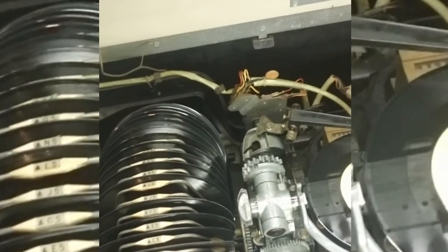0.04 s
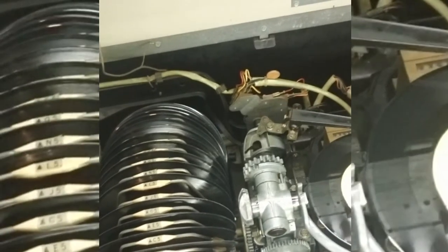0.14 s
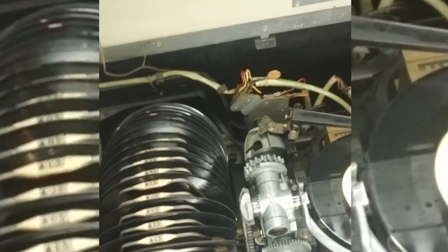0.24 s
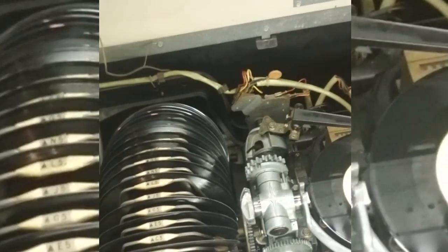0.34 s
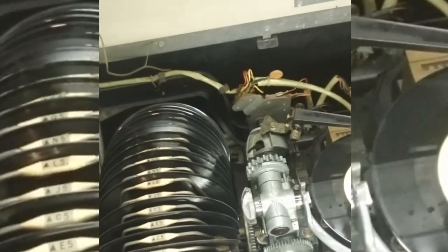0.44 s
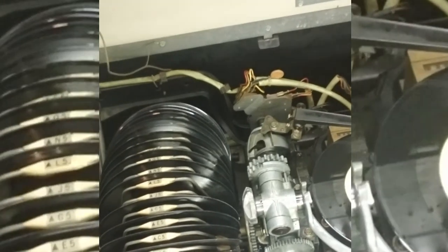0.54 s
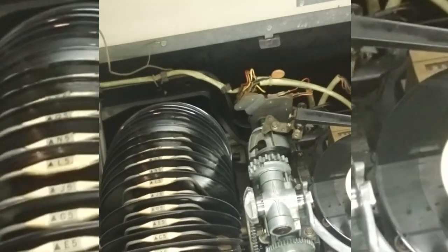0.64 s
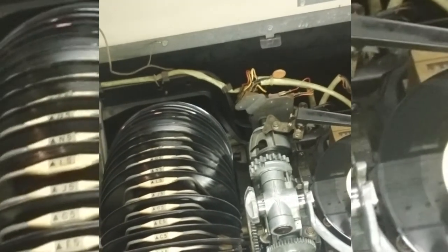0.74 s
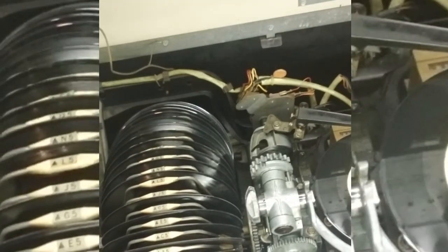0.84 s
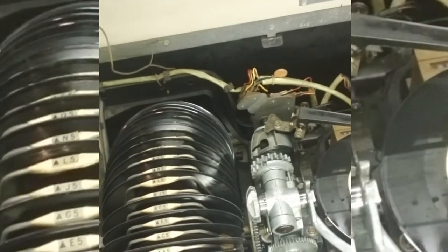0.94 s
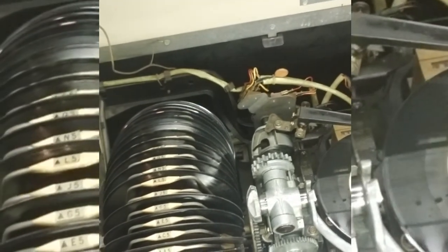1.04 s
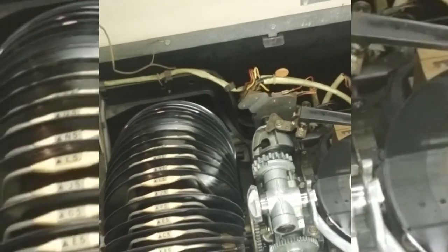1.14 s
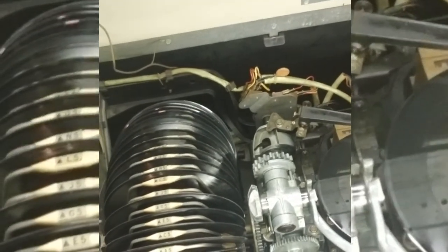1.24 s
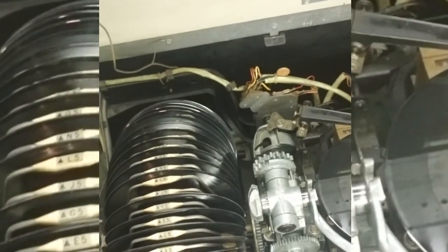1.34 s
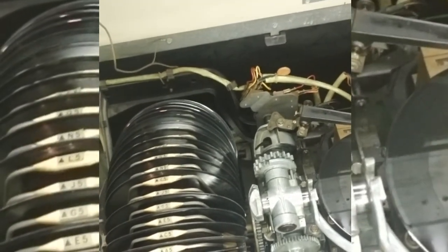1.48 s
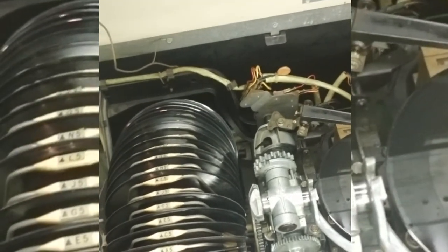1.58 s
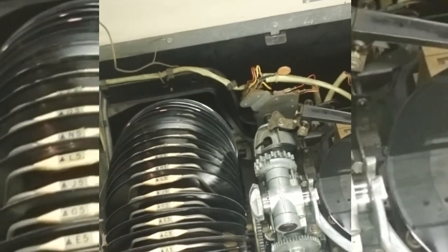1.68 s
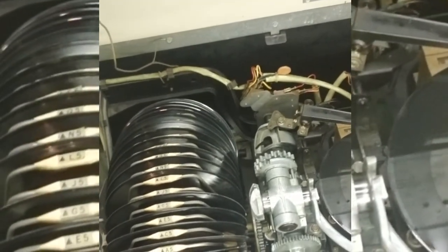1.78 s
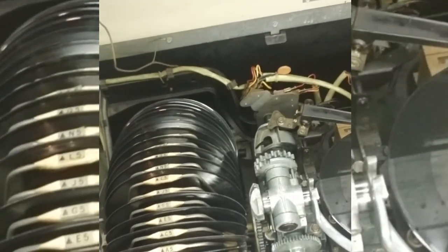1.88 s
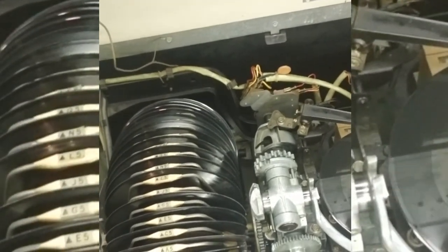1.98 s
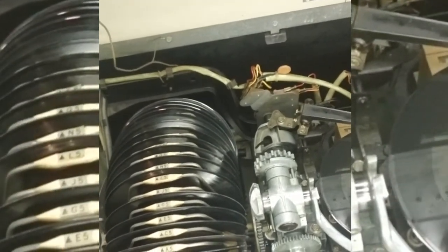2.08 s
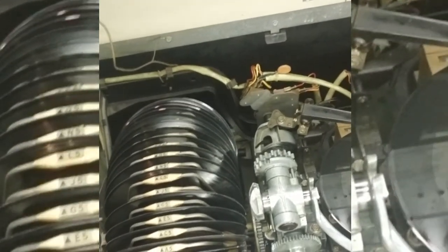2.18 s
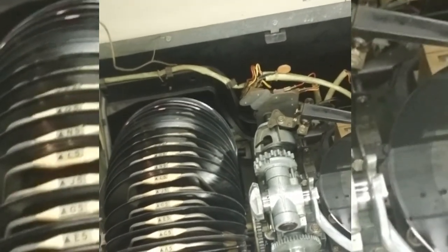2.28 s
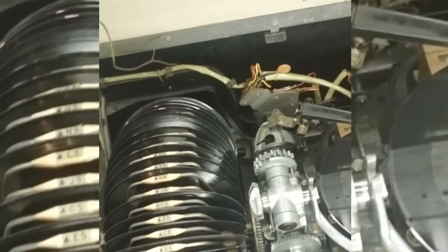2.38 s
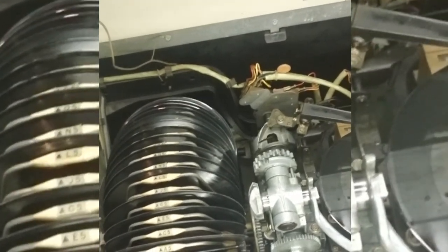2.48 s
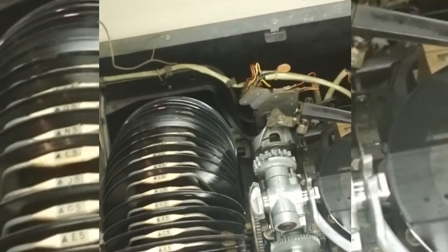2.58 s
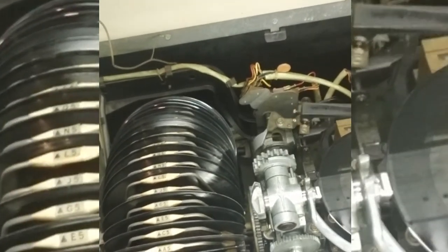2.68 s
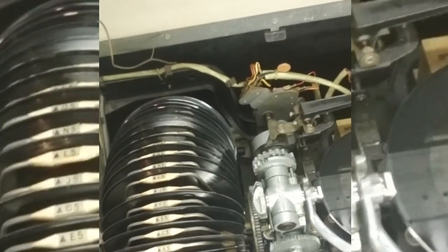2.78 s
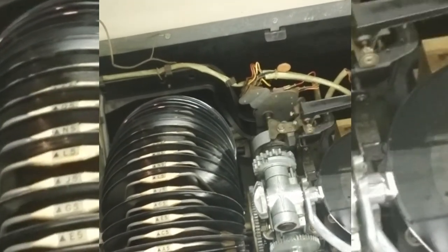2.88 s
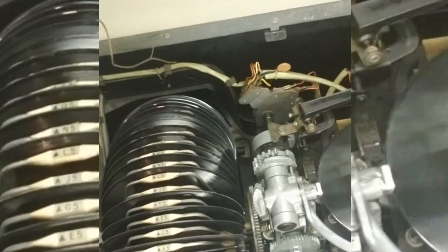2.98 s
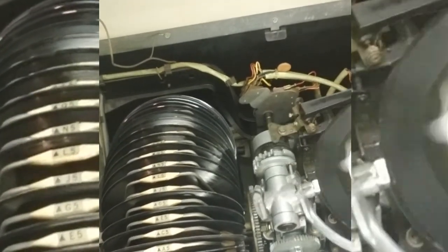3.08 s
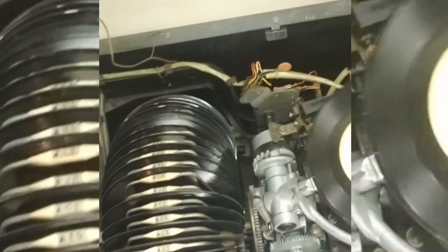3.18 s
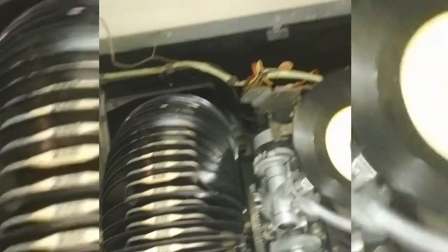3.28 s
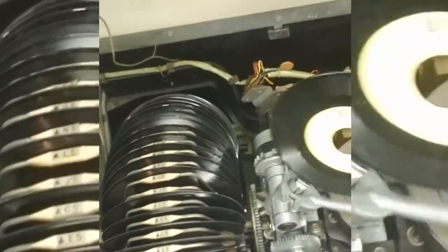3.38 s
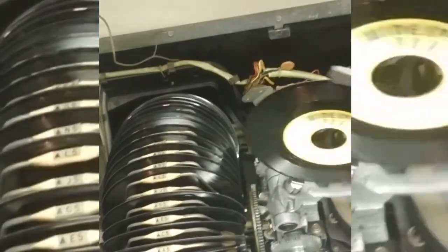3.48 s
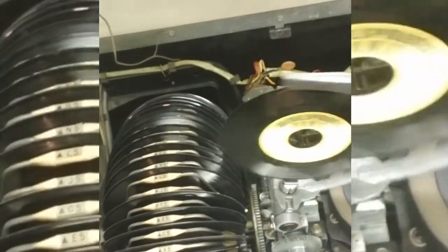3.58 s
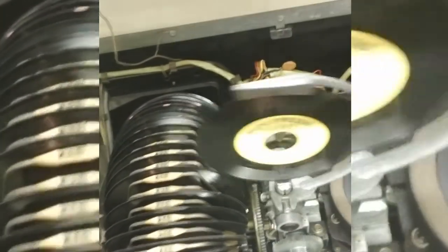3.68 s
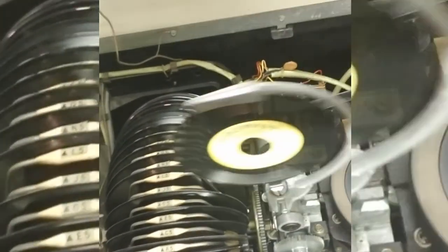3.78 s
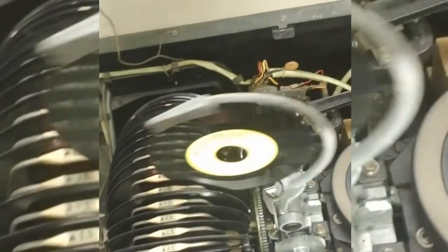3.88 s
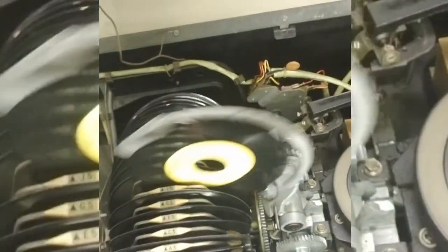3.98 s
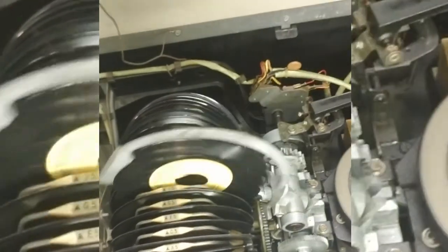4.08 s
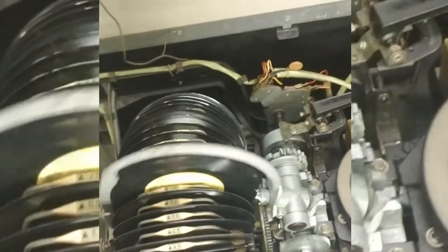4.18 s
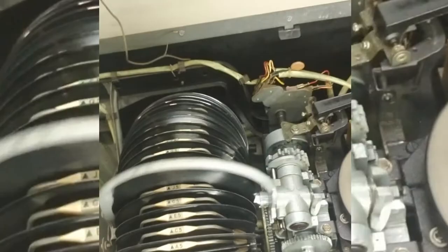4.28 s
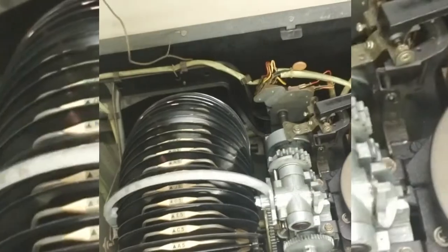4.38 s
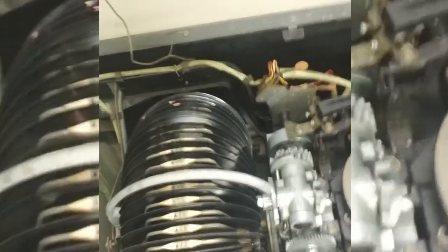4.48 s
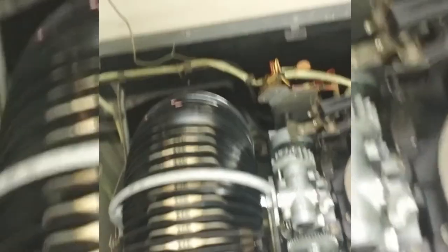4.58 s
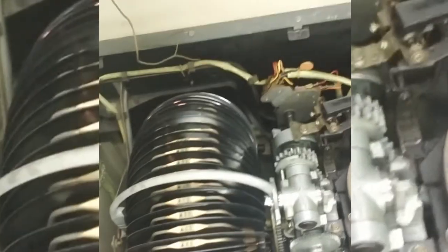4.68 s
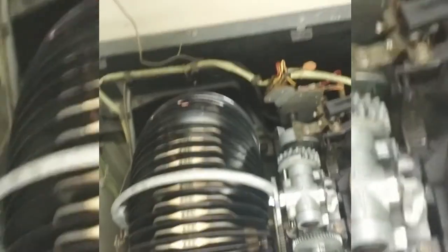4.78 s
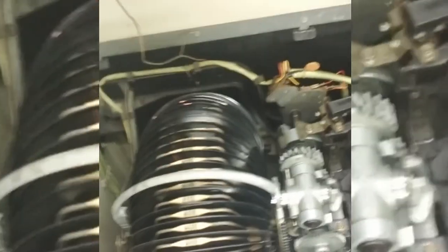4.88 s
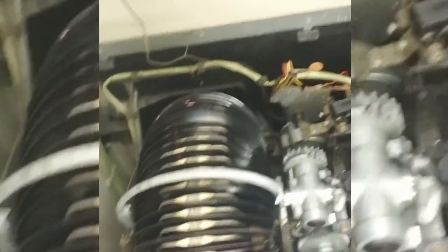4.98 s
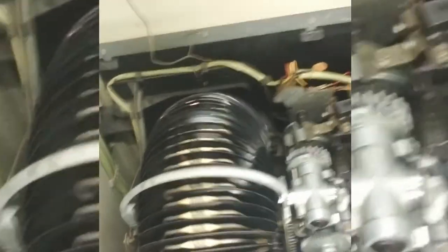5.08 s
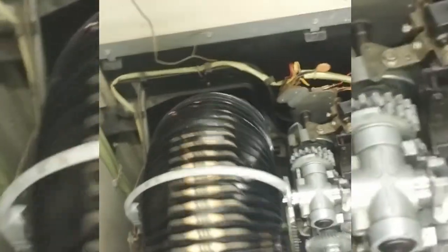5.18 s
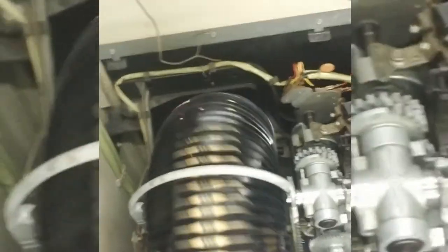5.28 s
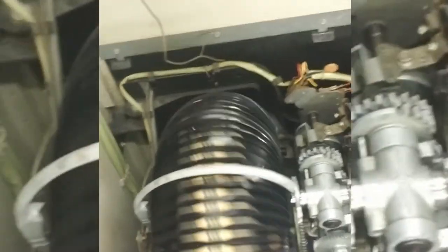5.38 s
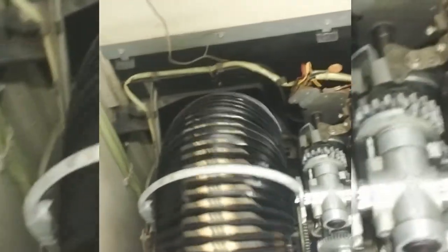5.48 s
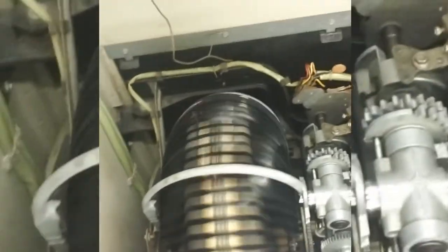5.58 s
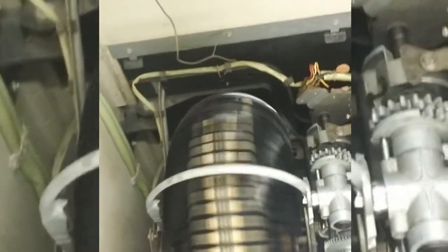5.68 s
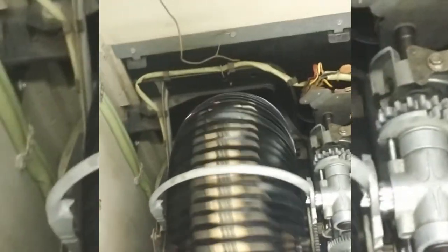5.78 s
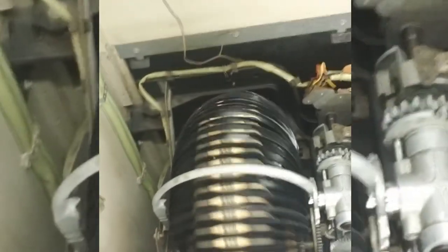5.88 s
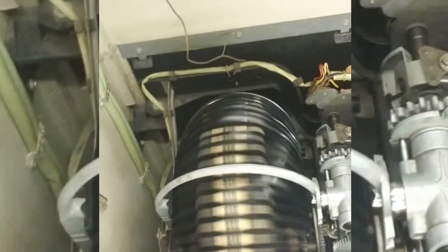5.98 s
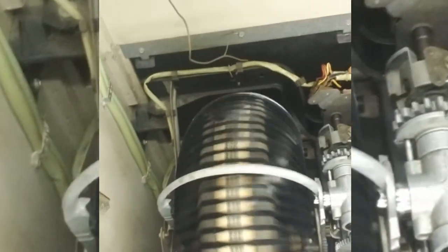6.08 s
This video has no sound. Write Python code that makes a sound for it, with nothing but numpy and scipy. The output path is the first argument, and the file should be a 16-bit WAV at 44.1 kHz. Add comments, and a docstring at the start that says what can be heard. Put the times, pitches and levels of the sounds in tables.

```python
"""Inside an old record changer, heard from close by in a quiet room.
Mains hum and a low rumble lie under everything. A latch trips, levers and cams clack and ring, and
the cabinet thumps. A small motor's gears whirr and whine as the arm puts a record back.
Then the record magazine spins up, and the records rattle in their slots over a wide rush."""
import sys
import numpy as np
from scipy import signal
from scipy.fft import rfft, irfft, next_fast_len
from scipy.io import wavfile
from scipy.ndimage import uniform_filter1d

SR = 44100
rng = np.random.default_rng(int(sys.argv[2]) if len(sys.argv) > 2 else 0)


def materialize(psi):
    """Save the field psi as 16-bit PCM at rate SR to the path in sys.argv[1].

    A 1-D psi becomes a single channel; in a 2-D psi each row is a channel.
    """
    bounded = np.clip(np.atleast_2d(psi).T, -1, 1)
    quanta = np.round(bounded * 32767).astype(np.int16)
    wavfile.write(sys.argv[1], SR, quanta)


N = 270839

# Blows of levers and cams; pan is left minus right, and a decay is the time to fade by 60 dB:
# start_s, level_db, pan_db, ring_hz, decay_s, treble_db, body_db
LEVER_BLOWS = [(2.228, -63, 3, 2500, 0.11, -30, 9), (2.2431, -9.5, 0.5, 6800, 0.11, 12, -7),
               (2.251, -25.5, 3, 6750, 0.28, -9, -41), (2.2606, -16.5, -30, 7540, 0.12, 22, -21),
               (2.3132, -22.5, 2, 1870, 0.057, 5, -6), (2.46, -27, 4, 4140, 0.065, -35, -29),
               (2.4797, -15.5, 1, 4080, 0.068, -16, -23), (2.571, -37.5, 3, 1960, 0.037, -39, 4),
               (2.6285, -34.5, 4.5, 2950, 0.065, 6, 5), (2.723, -41, 4, 11700, 0.073, 1, -2),
               (2.815, -30, 2, 5100, 0.072, -1, -12), (2.828, -23.5, 0.5, 10500, 0.19, 8, -41),
               (2.8494, -29, 3, 3670, 0.11, -4, -40), (2.8736, -17.5, -1.5, 13500, 0.062, -3, -16.5),
               (2.8938, -25.5, 2, 2300, 0.049, -9, -30), (2.9312, -19, 2, 15000, 0.14, 2, -13),
               (2.962, -20.5, -1.5, 3400, 0.086, 0, -15), (2.9831, -22.5, -1, 3370, 0.16, 0, -8.5),
               (3.003, -23, 0, 3070, 0.081, 5.5, -34), (3.0235, -30.5, 0, 3020, 0.27, -26, -13),
               (3.036, -31.5, 9, 5700, 0.061, -18, -9), (3.0483, -28, 0, 9400, 0.024, -1, -15),
               (3.5173, -38, 5, 3830, 0.12, 0, -5), (3.6299, -24.5, 2, 3920, 0.084, -43, -20),
               (3.664, -36.5, -3, 2550, 0.13, -34, -5), (4.021, -30, 2, 3560, 0.077, -36, 0.5),
               (4.035, -26, 4, 2220, 0.06, -35, -11), (4.1137, -40.5, -3, 2050, 0.067, -18, 0),
               (4.2816, -32.5, 1.5, 3780, 0.06, -7, -11), (4.312, -39, 0, 3200, 0.08, -7, -5),
               (4.3526, -32, 2, 2500, 0.073, 1, 4), (4.3602, -13, 11, 7640, 0.099, 2, -23),
               (4.3657, -17.5, 7, 13800, 0.09, -19, -12), (4.3732, -12, -6.5, 15270, 0.098, 3, -13),
               (4.379, -26, 11, 2400, 0.063, 4, -1), (4.3848, -23.5, 8, 3750, 0.092, -17, -11),
               (4.399, -30, 0.5, 477, 0.24, -30, -3.5), (4.492, -32.5, 0, 2960, 0.13, -22, -23),
               (4.9875, -32, 8, 7140, 0.04, 5, -33), (5.004, -31.5, -3, 760, 0.05, -15, -12), ]
# Tone colour of struck steel: pitch_hz, level_db
STEEL_COLOUR = [(590, -51), (1000, 5), (1250, 6), (1820, 4.5), (3240, 7), (6640, 2.5), (7490, -6.5),
                (9000, -45), (19800, -120)]
# Tone colour of a blow's bright top: pitch_hz, level_db
TREBLE_COLOUR = [(4710, -33), (8000, -5), (11000, 0), (15400, 5.5), (16200, -26)]
# Resonances of the dull knock under a blow: pitch_hz, width_hz, level_db
BODY_RESONANCES = [(330, 41, -7.5), (494, 100, -20.5), (704, 114, -3), (877, 77, -10), (1224, 360, -12)]
# The tones that each of three parts rings with: pitch_hz, level_db, decay_s
LATCH = [(610, -24, .2), (705, 0, .2), (833, -12, .7), (1280, -17, .09), (2495, -17, 1.3), (5552, -10, .14),
         (6546, -22, .22), (6912, -8, .07), (7100, -1, .05), (7722, -1, .07), (8365, -13, .33),
         (8760, -11, .16), (8912, -21, .3), (9076, -13, .16), (12358, -8, .1), (12721, -7, .1)]
GRIPPER = [(2237, -19, 0.2), (2394, -12, 0.055), (2930, -16, .05), (3330, -19.5, 0.061), (3530, -25, 0.034),
           (4920, -10.5, 0.041), (5300, 1.5, 0.015), (5640, -7.5, 0.035), (9570, -9, 0.034),
           (10300, -3.5, 0.03), (9150, -15, 0.071), (11950, -18, 0.07), (13600, -13, .06)]
HOUSING = [(460, -5.5, 0.069), (583, -4, 0.087), (725, 0.5, .045), (800, -0.5, 0.041)]
# Knocks on those parts; tones far from the favoured pitch ring less:
# start_s, part, level_db, favoured_hz, loss_db_per_octave
PART_STRIKES = [(2.247, LATCH, -18.5, 7300, 5), (2.329, LATCH, -39, 2495, 50),
                (2.482, LATCH, -18, 6740, 131), (2.485, LATCH, -12.5, 592, 138),
                (2.829, GRIPPER, -26.5, 5240, 1.5), (2.851, GRIPPER, -35, 3620, 60),
                (2.875, GRIPPER, -31, 11000, 15), (2.933, GRIPPER, -11, 3260, 59),
                (2.896, GRIPPER, -27, 2217, 50), (2.963, GRIPPER, -24, 3330, 30),
                (2.985, GRIPPER, -27, 8950, 23), (3.003, GRIPPER, -20, 3300, 42),
                (3.04, GRIPPER, -26.5, 5870, 62), (3.629, GRIPPER, -16, 4680, 96),
                (3.665, GRIPPER, -24, 2460, 70), (4.037, GRIPPER, -27, 2200, 60),
                (4.361, LATCH, -15.5, 1280, 64), (4.375, GRIPPER, -24, 2190, 60),
                (4.987, LATCH, -35.5, 7130, 61), (5.0055, HOUSING, -38.5, 740, 1),
                (5.028, HOUSING, -37.5, 590, 33)]
# Knocks on the cabinet: start_s, level_db, pan_db, brightness_db_per_octave, pitch_drop_share
CABINET_KNOCKS = [(2.255, -43, 3, 10.5, 0.3), (2.276, -28.5, 2, -2, 0.17), (2.313, -45.5, 0, 11, 0.091),
                  (2.379, -49, 3.5, 12, 0.076), (2.464, -37.5, -6, 3, 0.072), (2.485, -35, 1.5, 7, 0.054),
                  (2.523, -39, -1, 5.5, 0.13), (2.5716, -14.5, 1, -7, 1.68), (2.593, -22.5, -1, -11, 1.44),
                  (2.612, -36.5, 0, 4, 0.22), (5.003, -45, 3, 1.5, 0.11)]
# The cabinet's low tones: pitch_hz, level_db, decay_s
CABINET_TONES = [(76.4, -0.5, 0.096), (103, 10.5, 0.056), (192, 0.5, 0.092), (297.7, 3, 0.11),
                 (417, -23, 0.031), (642, -10, 0.1)]
# The arm motor's run; rasp is counted from the whine: time_s, whirr_db, whine_hz, whine_db, rasp_db
ARM_RUN = [(2.3, -50.5, 1016, -80, -3), (2.55, -58, 1031, -65, -7), (2.82, -55, 1055, -63.5, -6),
           (2.92, -48, 977, -59, -1), (3.15, -59, 994, -64.5, -7), (3.5, -54.5, 1000, -66.5, -1),
           (3.78, -53.5, 1033, -57, -8.5), (4.0, -53.5, 1067, -58, -2), (4.3, -53, 1070, -65, 4.5),
           (4.5, -53, 1035, -56, -5), (4.66, -56, 1007, -71, -6), (4.92, -58, 1004, -65.5, -11),
           (5.05, -55, 1034, -92, -5)]
# Tone colour of the gears: pitch_hz, level_db
GEAR_COLOUR = [(240, -69), (400, -14), (521, -5), (871, -6), (1020, -4.5), (1390, -24), (1760, -13),
               (2100, -6.5), (2590, -8), (2980, -8), (4530, -5.5), (5060, -8.5), (7700, -17), (8850, -23),
               (15300, -11.5), (16500, -11.5)]
# Resonances that the gears stir up: pitch_hz, width_hz, level_db
GEAR_RESONANCES = [(2330, 260, -2), (2630, 170, 1), (3890, 130, -3), (4125, 120, -4), (4380, 210, 3),
                   (4690, 170, 4), (7400, 960, -2)]
# Tones beside the whine: multiple_of_shaft_speed, level_db
SHAFT_TONES = [(22, -10), (23, -9), (25, -6), (26, -6), (27, -10), (28, -8)]
# The magazine's spin; tilt lifts the treble and lowers the rest: time_s, level_db, tilt_db
MAGAZINE_SPIN = [(5.004, -45, -1), (5.09, -44, 1), (5.226, -50.5, 1), (5.454, -50, 2.5),
                 (5.732, -42.5, 1.5), (5.906, -44.5, 2), (6.14, -39, 1)]
# Tone colour of its rush: pitch_hz, level_db
RUSH_COLOUR = [(180, -27), (300, -1), (597, -8.5), (730, -2.5), (780, 0.5), (1070, -4), (1210, -3),
               (2740, -4), (5740, -6), (8870, -17), (11800, -7), (15200, -8), (16500, -8.5)]
# Resonances in the rush: pitch_hz, width_hz, level_db
RUSH_RESONANCES = [(717.7, 14, -15), (1200, 7.4, -20), (5740, 730, -20.5), (6800, 1200, -14.5)]
# A band near 3 kHz thins out late in the arm's whirr and again midway through the magazine's rush:
# time_s, share_removed
MIDDLE_DIP = [(4.5, 0), (4.72, 0.8), (4.97, 0.4), (5.03, 0.03), (5.15, 0), (5.3, 0.5), (5.5, 0.4),
              (5.7, 0.17)]
# Loudness of the background: time_s, hum_db, rumble_db
BASS_LEVELS = [(0, -46.5, -54.5), (2.2, -47.5, -56), (2.45, -65, -46), (2.58, -54, -44.5),
               (2.7, -54, -54.5), (3.3, -53, -63.5), (3.6, -51, -59), (4.1, -50, -57), (4.45, -51, -62),
               (4.75, -55.5, -64.5), (4.95, -57.5, -64.5), (5.04, -51.5, -59.5), (5.42, -57.5, -61),
               (5.65, -51.5, -58), (6.14, -50.5, -57.5)]
# Swells of the 2nd and 4th mains multiples in one turn of the turntable: time_s, second_db, fourth_db
TURN_SWELLS = [(0, 1, 15), (.09, 6.5, 9), (.22, -2, 8), (.32, 3.5, 6.5), (.54, -8.5, -5.5), (.74, 4, 0),
               (.95, 2.5, -4.5), (1.12, 3.5, 0), (1.25, -5.5, -30)]
# Weaker tones that make the hum buzz: multiple_of_mains, level_db
BUZZ_TONES = [(1, -21.5), (5, -29), (6, -22.5), (10, -27)]
# Tone colour of the room's rumble: pitch_hz, level_db
RUMBLE_COLOUR = [(15, -48), (40, -11), (85, -4.5), (150, -8.5), (215, -8.5), (300, -11.5), (367, -15),
                 (440, -23), (620, -21.5), (1500, -53.5), (2000, -91)]
# Tone colour of the steady hiss: pitch_hz, level_db
HISS_COLOUR = [(530, -33), (900, -5.5), (1130, -2.5), (1220, -4), (1560, -7.5), (2660, -7), (3350, -9.5),
               (3600, -7.5), (4270, -11.5), (8350, -14.5), (11200, -11.5), (12200, -3.5), (15500, -13),
               (16500, -42)]
# Dulling of the right side, which faces away: pitch_hz, gain_db
RIGHT_SHADOW = [(20, -1.5), (700, -5), (2400, -0.5), (8000, -8), (16000, -12)]


def lever_clacks():
    """Each blow of a lever or cam is a crack and a burst of steel chatter over a duller body knock."""
    out, t = np.zeros((2, N)), np.arange(SR // 3) / SR
    crack = amp(-2.5 - 60 * t / 0.0068)
    treble_fade_db_per_s, body_rings_longer = 150, 3.22
    for start_s, db, pan_db, ring_hz, decay_s, treble_db, body_db in LEVER_BLOWS:
        noise = rng.standard_normal((2, len(t)))
        treble = amp(treble_db - treble_fade_db_per_s * t) * unit_level(colour(noise, TREBLE_COLOUR))
        steel = unit_level(colour(noise, STEEL_COLOUR)) + treble
        steel = metal_colour(steel, step_hz=130, depth_db=4.5)  # small parts: fewer, stronger peaks
        steel += 1.12 * unit_level(resonate(noise, min(ring_hz, 15000), 0.16 * ring_hz))
        steel *= (amp(-60 * t / decay_s) + crack) * (1 - np.exp(-t / 0.0015))
        rebounds_db = 2 * unit_level(uniform_filter1d(rng.standard_normal(len(t)), size=50))
        steel *= amp(rebounds_db)
        body = unit_level(sum(amp(d) * resonate(noise, f, w) for f, w, d in BODY_RESONANCES))
        body *= amp(body_db - 60 * t / (body_rings_longer * decay_s)) * (1 - np.exp(-t / 0.0049))
        blow = stereo(steel, likeness=0.082, pan_db=pan_db) + stereo(body, likeness=0.91, pan_db=pan_db)
        rough_peak = np.pi * np.sqrt((blow[:, :200] ** 2).mean())  # about three times the opening level
        add(out, start_s, amp(db) * blow / rough_peak)
    return out


def ringing_parts():
    """Struck parts ring with dying tones that waver as the part buzzes."""
    out, t = np.zeros((2, N)), np.arange(SR * 3 // 4) / SR
    for start_s, part, db, favoured_hz, loss_db in PART_STRIKES:
        waver = wander((2, len(t)), samples=300)
        ring = 0
        for hz, tone_db, decay_s in part:
            struck_db = tone_db - abs(loss_db * np.log2(hz / favoured_hz))
            phase = 0.58 * waver[1] + rng.normal(0, 1.0, (2, 1))  # each side gets its own
            ring += amp(struck_db - 60 * t / decay_s) * np.sin(2 * np.pi * hz * t + phase)
        attack = 1 - np.exp(-t / 0.00027)
        add(out, start_s, amp(db + 1.73 * waver[0]) * ring * attack * amp([[4], [-3]]))
    return out


def cabinet_thumps():
    """Knocks set the cabinet's low tones going; a hard one starts high and drops in pitch."""
    out, t = np.zeros((2, N)), np.arange(SR // 3) / SR
    for start_s, db, pan_db, bright_db, drop in CABINET_KNOCKS:
        bent_time = t + drop * 0.0055 * (1 - np.exp(-t / 0.0054))
        thump = 0
        for hz, tone_db, decay_s in CABINET_TONES:
            lift_db = bright_db * np.clip(np.log2(hz / 95), 0, 1.7)
            thump += amp(tone_db + lift_db - 60 * t / decay_s) * np.sin(2 * np.pi * hz * bent_time)
        add(out, start_s, amp(db) * thump * (1 - np.exp(-t / 0.011)) * pan(pan_db))
    return out


def arm_motor():
    """Gears whirr through the metal frame, and their meshing teeth whine at a pitch set by the load."""
    whirr_db, hz, whine_db, rasp_db = curves(ARM_RUN)
    gear_teeth = 24
    drive = rattle(knocks_per_s=350, spread_db=-5, smooth_part=4.8)
    whirr = unit_level(colour(drive, GEAR_COLOUR))
    whirr += 0.5 * unit_level(sum(amp(d) * narrow_band(drive, f, w) for f, w, d in GEAR_RESONANCES))
    whirr += amp(whine_db + rasp_db - whirr_db - 2) * narrow_band(drive, hz=1207, width_hz=230)  # rasp
    fuzz = narrow_band(rng.standard_normal((2, N)), hz, width_hz=61)
    mesh_phase = 2 * np.pi * np.cumsum(hz) / SR
    whine = 0.4 * fuzz + 1.1 * np.sin(mesh_phase) + amp(-12) * np.sin(mesh_phase / 2)
    shaft_phase = mesh_phase / gear_teeth
    for multiple, db in SHAFT_TONES:
        wobble = wander((2, N), samples=2500)
        whine += amp(db + rasp_db + 3 * wobble[0]) * np.sin(multiple * shaft_phase + 0.8 * wobble[1])
    whirr = drifting_colour(metal_colour(whirr), depth_db=1.3)
    whirr = stereo(whirr * amp(whirr_db), likeness=0.097, pan_db=2)
    whine = stereo(whine * amp(whine_db), likeness=0.88, pan_db=10.5)
    return during(ARM_RUN) * (whirr + whine)


def spinning_magazine():
    """As the magazine spins, records rattle in their slots over a wide rush."""
    db, tilt_db = curves(MAGAZINE_SPIN)
    drive = rattle(knocks_per_s=2200, spread_db=5, smooth_part=4.7)
    rush = unit_level(colour(drive, RUSH_COLOUR))
    rush += sum(amp(d) * resonate(drive, f, w) for f, w, d in RUSH_RESONANCES)
    low = signal.lfilter(*signal.butter(1, 4000, fs=SR), rush)
    rush = low * amp(-tilt_db) + (rush - low) * amp(tilt_db)
    rush = drifting_colour(metal_colour(rush), depth_db=1.2)
    return during(MAGAZINE_SPIN) * stereo(rush * amp(db), likeness=0.34, pan_db=1.5)


def mains_hum():
    """Transformer and motor hum at multiples of the mains pitch, wavering while the turntable runs."""
    hum_db = curves(BASS_LEVELS)[0]
    t = np.arange(N) / SR
    mains_hz, drone_hz, throb_hz, beat_hz = 60.25, 186.2, 2.94, 11.65
    turn_s, stop_s, fade_s, running_boost_db = 1.317, 2.5, 0.2, 11
    running = np.clip((stop_s - t) / fade_s + 1, 0, 1)
    times, *swells = np.transpose(TURN_SWELLS)
    second_db, fourth_db = [running * np.interp(t, times, db, period=turn_s) for db in swells]
    throb = 1 + 0.37 * np.cos(2 * np.pi * throb_hz * (t - 0.08))
    phase = 2 * np.pi * mains_hz * t
    tones = amp(second_db) * np.sin(2 * phase) + amp(fourth_db - 14.5) * throb * np.sin(4 * phase + 1)
    buzz = sum(amp(db) * np.sin(k * phase + 7 * rng.random()) for k, db in BUZZ_TONES)
    tones += amp(running_boost_db * running / 2) * buzz
    tones *= amp(1.5 * running * wander(N, samples=1200))  # flutter
    drone = np.cos(np.pi * beat_hz * (t - 0.034)) * np.sin(2 * np.pi * drone_hz * t)  # two tones beating
    tones += amp(running_boost_db * running - 18) * (2 - throb) * drone
    thin_whine = amp(-88) * np.sin(2 * np.pi * 3499 * t)
    sides = amp([2.1 - 1.3 * running, -3 + running])
    return (np.sqrt(2) * amp(hum_db) * tones + thin_whine) * sides


def room_rumble():
    """The room's low rumble: deep noise that swells and sinks."""
    rumble = unit_level(colour(rng.standard_normal((2, N)), RUMBLE_COLOUR))
    return stereo(rumble * amp(curves(BASS_LEVELS)[1]), likeness=0.76, pan_db=5.5)


def room_echo(x):
    """Many small echoes from cabinet and room; their treble dies sooner."""
    slots = np.arange(200, SR // 2 - 20, 20)[:, None]
    delays = slots + rng.integers(0, 20, (len(slots), 2))
    echoes = np.zeros((SR // 2, 2))
    np.put_along_axis(echoes, delays, rng.choice([-1., 1.], delays.shape), 0)
    hz, t, spectrum = signal.stft(echoes.T, SR, nperseg=256)
    decay_s = np.interp(hz, [300, 3000, 14000], [.45, .4, .28])[:, None]
    tail = signal.istft(spectrum * amp(-60 * t / decay_s), SR, nperseg=256)[1]
    return signal.fftconvolve(x, tail / np.linalg.norm(tail[0]), axes=1)[:, :N]


def rattle(knocks_per_s, spread_db, smooth_part):
    """Noise with small random knocks in it, felt on both sides at once."""
    strengths = amp(spread_db * np.minimum(rng.exponential(1, N), 4))
    knocks = strengths * (rng.random(N) < knocks_per_s / SR)
    knocks = signal.oaconvolve(knocks, np.exp(-np.arange(600) / 90))[:N]
    return rng.standard_normal((2, N)) * (smooth_part + unit_level(knocks))


def metal_colour(x, step_hz=45, depth_db=2.9):
    """The metal frame's many small resonances add random peaks and dips above the bass."""
    hz = np.arange(1500, SR / 2, step_hz)
    peaks_db = depth_db * rng.standard_normal(len(hz))
    return colour(x, np.transpose([np.r_[0, hz], np.r_[0, peaks_db]]))


def drifting_colour(x, depth_db):
    """The tone colour drifts in random patches, and a middle band thins out at set times."""
    spectrum = signal.stft(x, nperseg=512)[2]
    patches = uniform_filter1d(rng.standard_normal(spectrum.shape[1:]), size=6, axis=0)
    patches = unit_level(uniform_filter1d(patches, size=14, axis=1))
    x = signal.istft(spectrum * amp(depth_db * patches), nperseg=512)[1][:, :N]
    return x - np.clip(curves(MIDDLE_DIP)[0], 0, 1) * resonate(x, hz=3180, width_hz=880)


def amp(db):
    """Turns decibels into a gain."""
    return 10 ** (np.asarray(db) / 20)


def unit_level(x):
    """Scales a signal to an average (rms) level of 1."""
    return x / np.sqrt(np.mean(x ** 2) + 1e-20)


def wander(shape, samples):
    """A smooth random wobble; more samples make it slower."""
    return unit_level(uniform_filter1d(uniform_filter1d(rng.standard_normal(shape), samples), samples))


def curves(rows):
    """Joins each column's values with straight lines over time, holding the end values."""
    times, *columns = np.transpose(rows)
    return [np.interp(np.arange(N) / SR, times, column) for column in columns]


def during(rows):
    """One while the table lasts, with 10 ms fades."""
    t = np.arange(N) / SR
    return np.clip(np.minimum(t - rows[0][0], rows[-1][0] + .02 - t) / .01, 0, 1)


def colour(x, points):
    """Shapes the tone colour with (pitch_hz, level_db) points."""
    point_hz, db = np.transpose(points)
    size = next_fast_len(x.shape[-1] + x.shape[-1] % 2, True)
    hz = np.arange(size // 2 + 1) * SR / size
    gain = amp(np.interp(np.log(hz + 1), np.log(point_hz + 1), db))
    return irfft(rfft(x, size) * gain, size)[..., :x.shape[-1]]


def resonate(x, hz, width_hz):
    """A resonance: lets through the sound near a steady or moving pitch."""
    turn = np.exp(2j * np.pi * np.cumsum(hz * np.ones(x.shape[-1])) / SR)
    feedback = np.exp(-np.pi * abs(width_hz) / SR)
    return 2 * (turn * signal.lfilter([1 - feedback], [1, -feedback], x / turn)).real


def narrow_band(x, hz, width_hz):
    """The same resonance twice over, brought to level 1."""
    return unit_level(resonate(resonate(x, hz, width_hz), hz, width_hz))


def pan(db):
    """Left and right gains; above 0 dB the left is louder."""
    return amp([[db / 2], [-db / 2]])


def stereo(x, likeness, pan_db):
    """Blends two rows into left and right; a likeness of 1 puts the same signal on both."""
    return np.array([x[0], likeness * x[0] + np.sqrt(1 - likeness ** 2) * x[1]]) * pan(pan_db)


def add(mix, start_s, sound):
    """Mixes a stereo sound in at a time."""
    part = mix[:, round(start_s * SR):][:, :sound.shape[1]]
    part += sound[:, :part.shape[1]]


def scene():
    """All sources together; only the blows echo."""
    blows = lever_clacks() + ringing_parts() + cabinet_thumps()
    echo = amp(-10.5) * room_echo(blows)
    return blows + echo + mains_hum() + room_rumble() + arm_motor() + spinning_magazine()


def record(dry):
    """Dulls and delays the right side, adds faint hiss and cuts the highest treble."""
    lag_s, hiss_db, cutoff_hz = 0.000096, -73, 15850
    size = 2 * next_fast_len(N // 2 + 1, True)
    delay = np.exp(-2j * np.pi * np.fft.rfftfreq(size, 1 / SR) * lag_s)
    right = irfft(rfft(colour(dry[1], RIGHT_SHADOW), size) * delay, size)[:N]
    hiss = unit_level(colour(rng.standard_normal((2, N)), HISS_COLOUR))
    mix = np.array([dry[0], right]) + amp(hiss_db) * stereo(hiss, likeness=0.033, pan_db=3.5)
    treble_cut = signal.firwin(511, cutoff_hz, window=("kaiser", 8), fs=SR)
    return signal.oaconvolve(mix, treble_cut[None], "same")


dry = scene()
out = record(dry)
materialize(out)
```